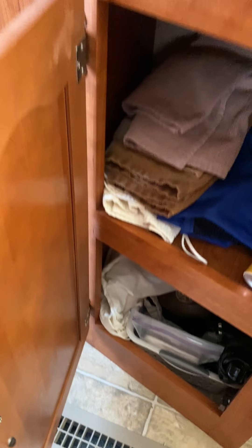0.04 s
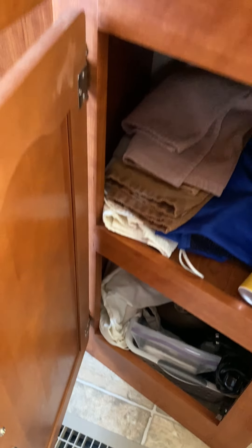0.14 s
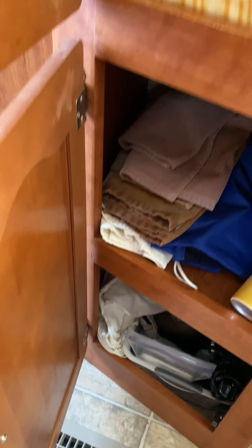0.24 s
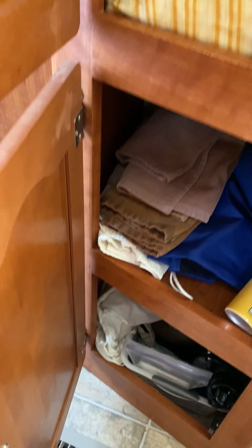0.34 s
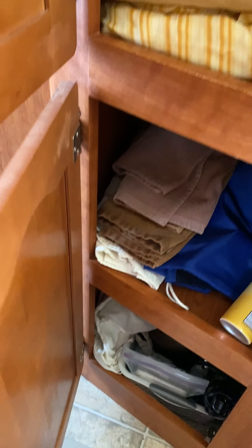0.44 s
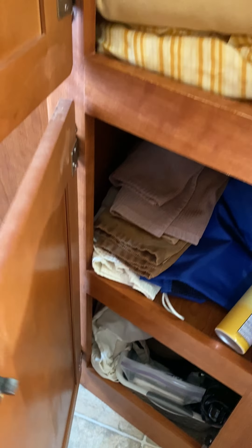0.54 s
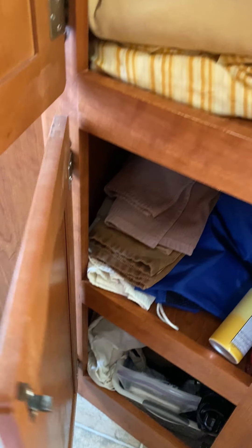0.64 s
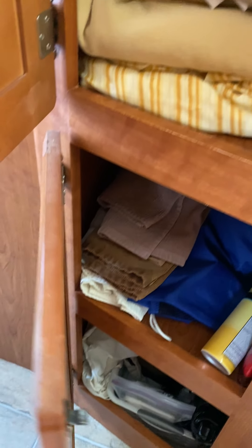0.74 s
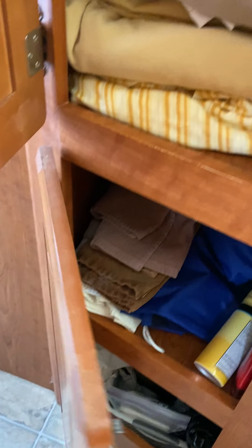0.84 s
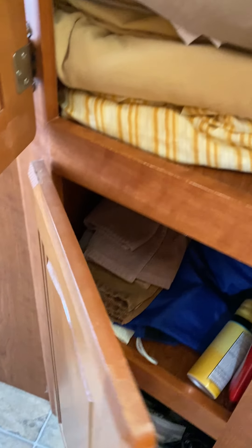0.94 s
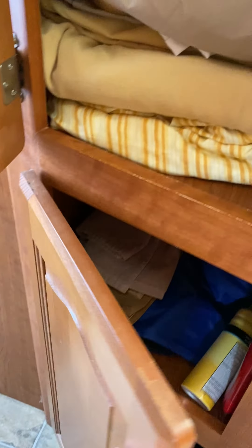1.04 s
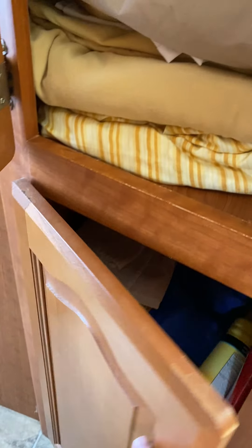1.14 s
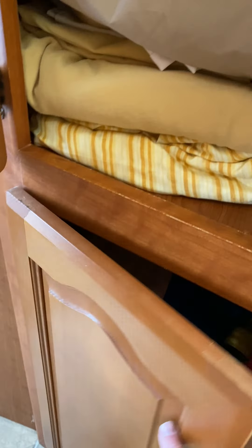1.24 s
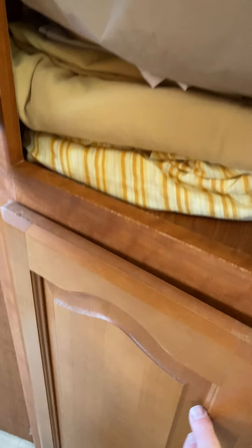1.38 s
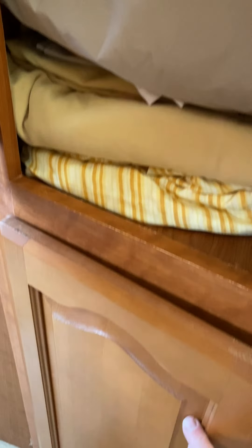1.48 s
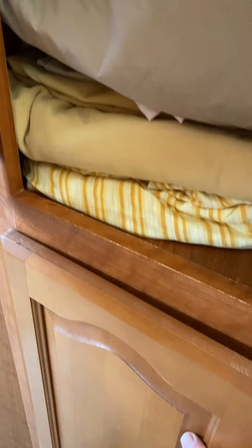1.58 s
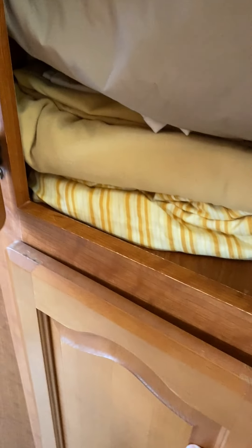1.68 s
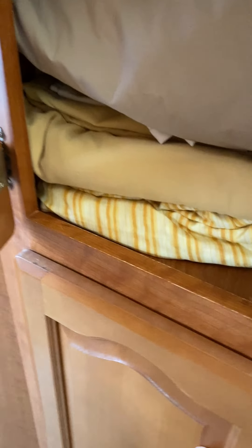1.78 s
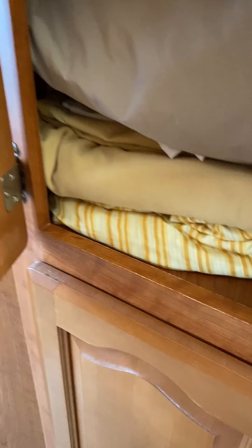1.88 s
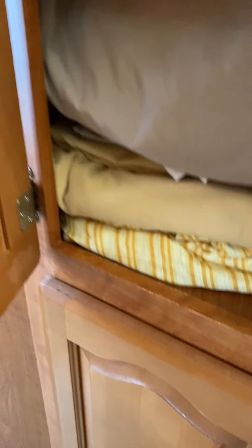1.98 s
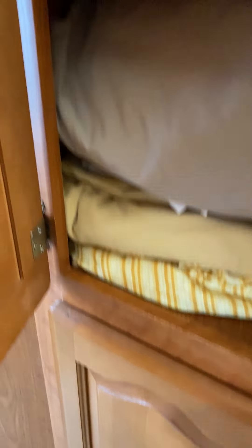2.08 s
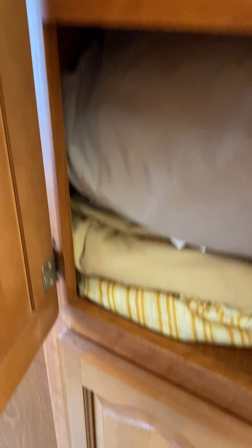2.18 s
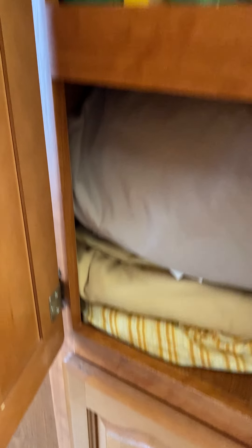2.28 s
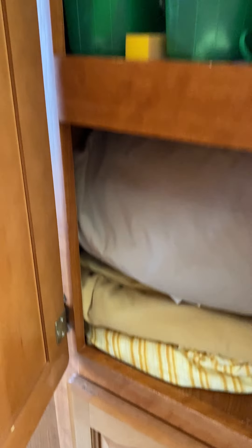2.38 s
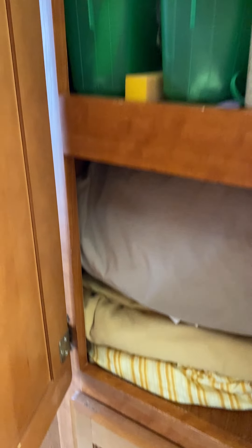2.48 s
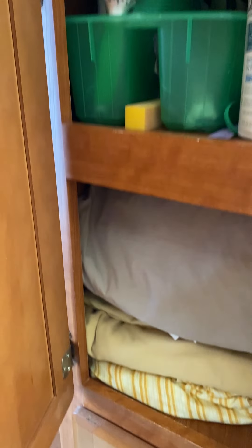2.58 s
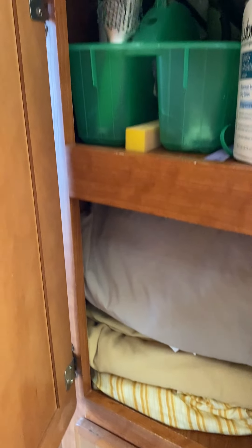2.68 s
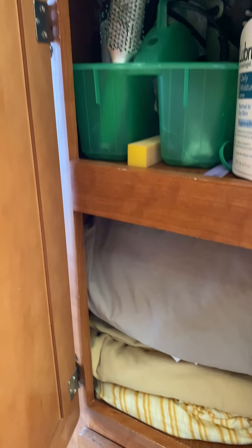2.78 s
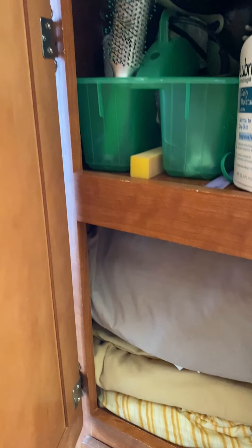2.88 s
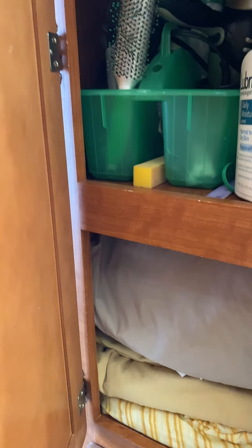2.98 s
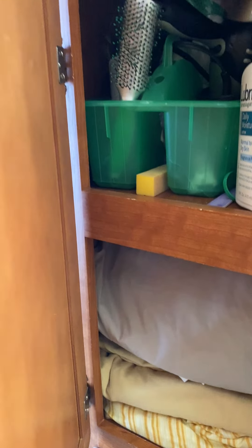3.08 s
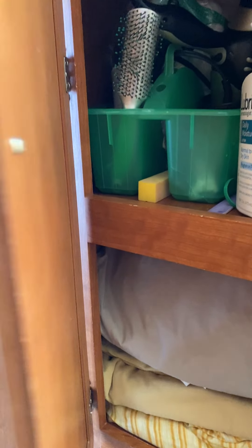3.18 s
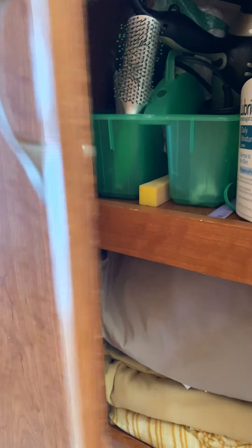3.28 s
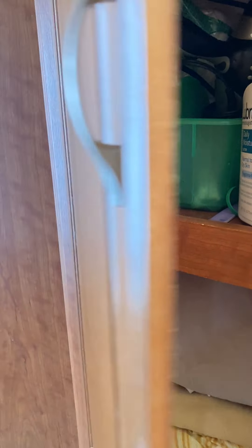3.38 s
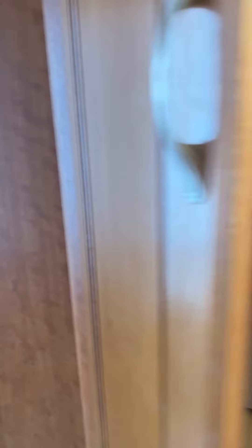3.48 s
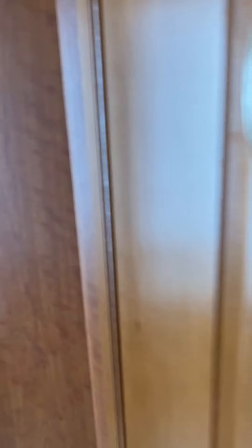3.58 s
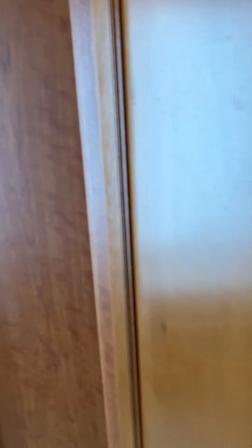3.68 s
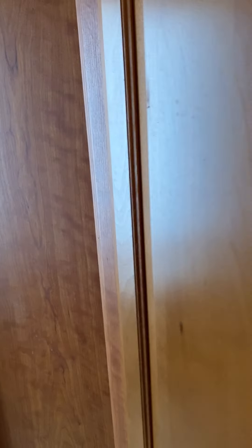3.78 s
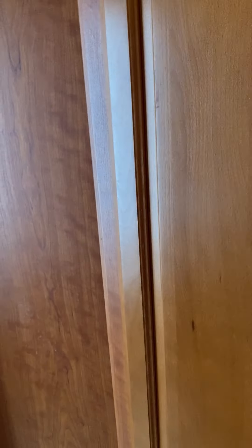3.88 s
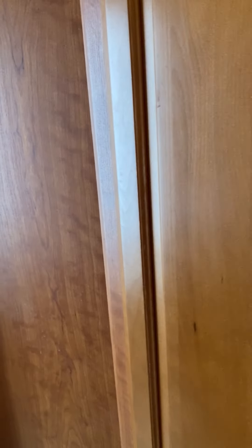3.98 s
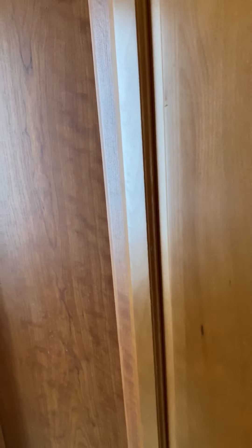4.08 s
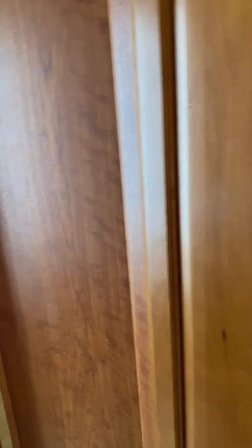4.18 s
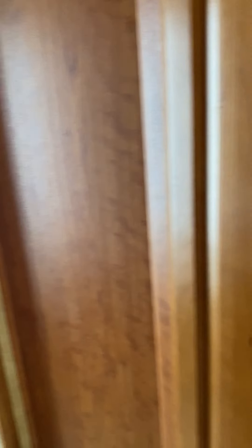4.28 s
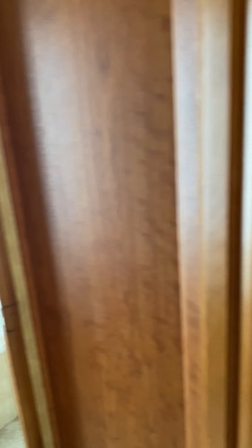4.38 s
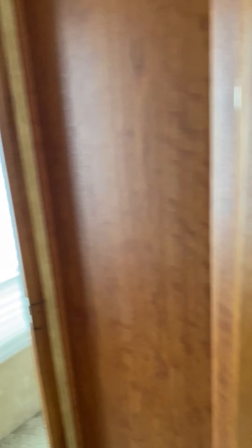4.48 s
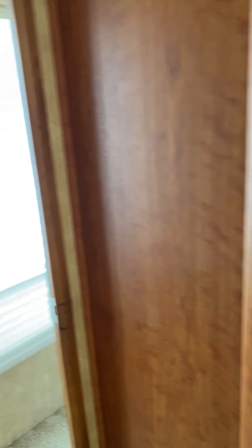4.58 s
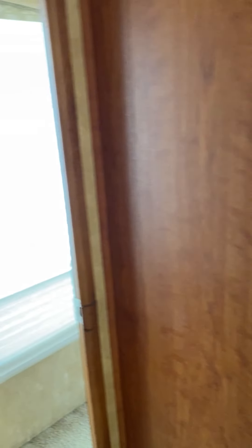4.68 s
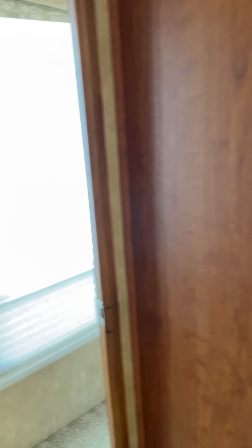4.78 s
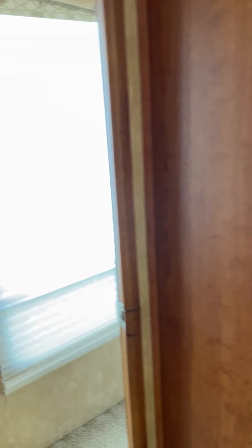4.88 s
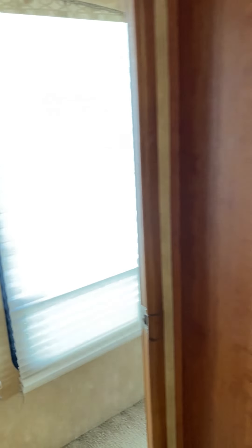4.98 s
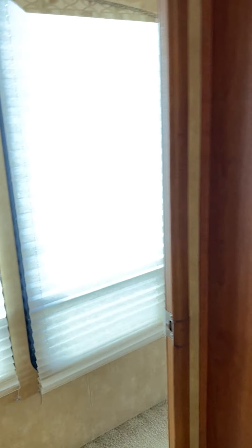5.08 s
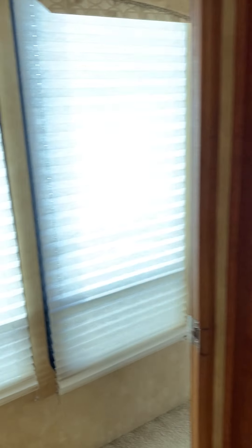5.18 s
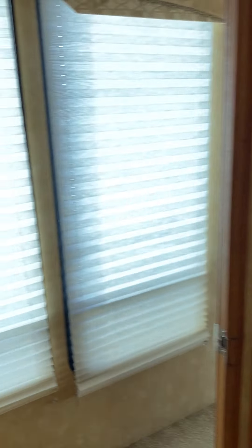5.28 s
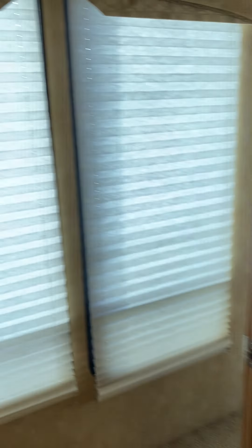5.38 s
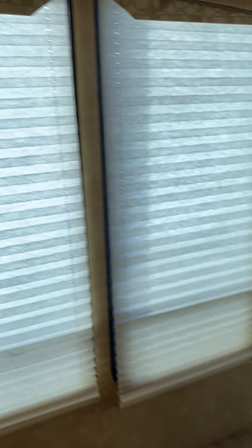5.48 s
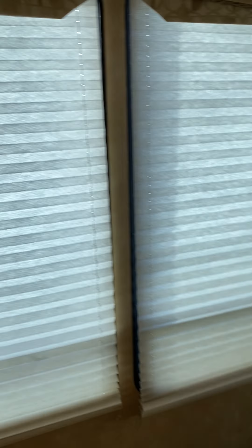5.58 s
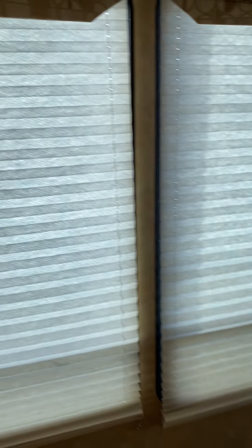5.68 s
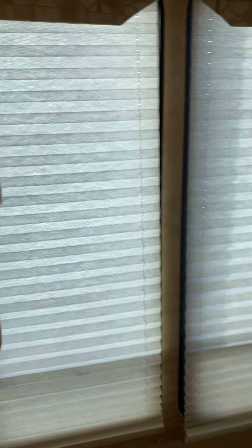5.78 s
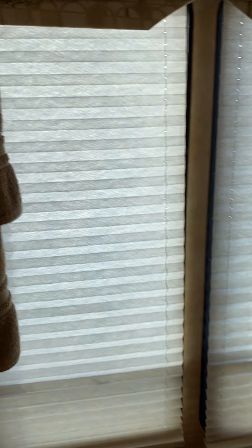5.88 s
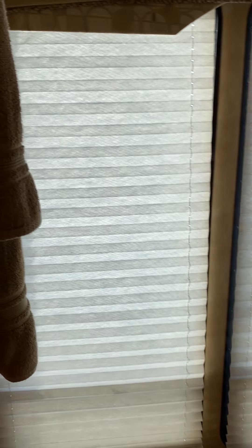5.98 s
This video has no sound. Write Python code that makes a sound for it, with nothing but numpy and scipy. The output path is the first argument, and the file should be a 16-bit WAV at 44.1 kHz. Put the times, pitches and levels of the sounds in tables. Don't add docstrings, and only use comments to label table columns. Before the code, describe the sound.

Two wooden cabinet doors close in a small quiet cabin, each knocking past its catch and slamming hollowly, with a hinge squeak between them.

```python
import sys
import numpy as np
from scipy import signal
from scipy.fft import rfft, irfft
from scipy.io import wavfile
from scipy.ndimage import uniform_filter1d

SR = 44100
rng = np.random.default_rng(int(sys.argv[2]) if len(sys.argv) > 2 else 0)


def invert_db(x):
    u = np.asarray(x, float) / 20
    return 10 ** u


def log_audio(samples):
    frames = np.atleast_2d(samples).T
    limited = np.clip(frames, -1, 1)
    pcm = np.round(limited * 32767).astype(np.int16)
    wavfile.write(sys.argv[1], SR, pcm)


N = 266760
HZ = np.fft.rfftfreq(N, 1 / SR)


def on_log(table, hz, column=1):
    table = np.array(table)
    return np.interp(np.log(np.maximum(hz, 1)), np.log(table[:, 0]), table[:, column])


def unit(x):
    return x / np.sqrt(np.mean(x ** 2))


def add(out, s, x):
    i = int(s * SR)
    out[i:i + len(x)] += x[:N - i]


def filtered(x, order, hz, kind):
    return signal.sosfilt(signal.butter(order, hz, kind, fs=SR, output="sos"), x)


def ring(x, modes):
    out = 0
    for hz, db, t60 in modes:
        pole = np.exp((2j * np.pi * hz - np.log(1000) / t60) / SR)
        out = out + invert_db(db) * signal.lfilter([1], [1, -pole], x + 0j).imag
    return out


def struck(events, rise_s):
    out, t = np.zeros(N), np.arange(SR // 2) / SR
    for s, hz, db, t60 in events:
        envelope = (1 - np.exp(-t / rise_s)) * invert_db(db - 60 * t / t60)
        add(out, s, np.sin(2 * np.pi * hz * t) * envelope)
    return out


def band(lo_hz, hi_hz):
    return unit(filtered(rng.standard_normal(N), 2, [lo_hz, hi_hz], "band"))


def walk(rate):
    k = int(SR / rate)
    steps = np.repeat(rng.standard_normal(N // k + 1), k)
    return unit(uniform_filter1d(steps, k)[:N])


def swells(rows):
    edge_db, edge_curve = 12, 1.9
    t, gains = np.arange(N) / SR, 0
    for s, length, *levels in rows:
        away = np.abs(2 * (t - s) / length)
        shape = invert_db(-edge_db * away ** edge_curve) * np.clip(2 - away, 0, 1)
        gains = gains + invert_db(np.array(levels)[:, None]) * shape
    return gains


def tail(scale):
    # (frequency [Hz], t60 [s])
    cabin_t60 = [(100, 0.35), (400, 0.2), (1500, 0.14), (4000, .16), (10000, 0.09)]
    t, out = np.arange(SR // 2) / SR, 0
    for hz in 63 * 2. ** np.arange(9):
        octave = band(hz / 1.41, min(hz * 1.647, 16500))[:len(t)]
        decay = invert_db(-60 * t / (scale * on_log(cabin_t60, hz)))
        out = out + np.sqrt(min(hz, 6000)) * octave * decay
    return out / np.sqrt(np.sum(out ** 2))


def cabin_echo(x):
    late = filtered(tail(3.2), 2, 700, "high")
    late = late * invert_db(2.5 * walk(98)[:len(late)])
    return signal.fftconvolve(x, invert_db(-10) * tail(0.79) + invert_db(-28) * late)[:N]


def pair(x, column):
    # (frequency [Hz], near sound [0-1], diffuse sound [0-1])
    coherence = [(110, 1, 1), (190, .9995, .996), (320, .95, .8), (700, .75, .25), (1700, .85, .35),
                 (3400, .48, .17), (6400, .985, .975), (14000, .99, .98)]
    alike = np.clip(on_log(coherence, HZ, column), 0, 1)
    scatter = rfft(tail(.08)[:1024])
    all_pass = irfft(scatter / np.abs(scatter))
    other = rfft(signal.fftconvolve(x, all_pass)[:N])
    shared = np.sqrt((1 + alike) / 2) * rfft(x)
    return irfft(shared + np.sqrt((1 - alike) / 2) * other * np.array([[1], [-1]]), N)


def cabin():
    # (frequency [Hz], density [dB per Hz])
    spectrum = [(25, -26), (54, 0.5), (82, -2.5), (130, -18), (500, -37), (2200, -40), (5500, -47),
                (16000, -56)]
    noise = rfft(rng.standard_normal(N)) * invert_db(on_log(spectrum, HZ))
    low = 1 / (1 + (HZ / 200) ** 2)
    rumble = irfft(noise * low, N) * invert_db(2.0 * walk(1.8))
    hiss = irfft(noise * (1 - low), N)
    return invert_db(-61) * (rumble + hiss) / np.sqrt(np.mean(irfft(noise, N) ** 2))


def handling():
    # (middle [s], length [s], level [dB])
    moves = [(.03, 0.11, -56), (.36, 0.18, -58), (1.35, 0.2, -62), (2.2, 0.21, -48), (2.45, .15, -55.5),
             (2.746, 0.073, -44.5), (4.5, .15, -47.5), (4.7, 0.23, -56.5), (5.35, 0.31, -59),
             (5.63, 0.099, -59), (5.8, 0.2, -55)]
    return band(31, 80) * invert_db(3.0 * walk(49)) * swells(moves)[0]


def rubbing():
    # (middle [s], length [s], hiss [dB], dull rub [dB], bright rub [dB])
    cloth = [(.36, 0.13, -91, -87, -89), (1.01, 0.66, -100, -101, -85), (2.2, 0.28, -80, -85, -84),
             (2.73, 0.072, -81, -88, -79), (3.04, 0.052, -73.5, -82, -97), (3.16, 0.17, -74.5, -91, -100),
             (3.51, .1, -75, -88, -74.5), (3.65, 0.16, -73, -75, -83.5), (3.72, 0.047, -75, -82, -100),
             (3.82, 0.15, -70, -90, -75.5), (4.5, 0.074, -79, -83, -86), (4.66, 0.17, -71.5, -81, -72),
             (4.82, 0.2, -67, -84, -71), (5.0, 0.22, -80.5, -78.5, -89), (5.14, 0.14, -86, -89, -91),
             (5.27, 0.21, -70.5, -64.5, -89), (5.37, 0.098, -77.5, -92, -84.5), (5.5, 0.11, -87, -72, -100),
             (5.63, 0.12, -68.5, -78, -76.5), (5.8, .14, -86, -77, -100), (5.95, 0.12, -88.5, -80, -87)]
    # (middle [s], length [s], hiss [dB], dull rub [dB], bright rub [dB])
    roller = [(1.419, 0.023, -64, -66, -83), (1.497, 0.081, -57, -47, -61), (1.602, 0.16, -61.5, -57, -74),
              (1.735, .08, -61, -71.5, -68), (1.786, 0.053, -50, -43, -68.5),
              (2.859, 0.066, -54.5, -57.5, -65), (4.007, 0.09, -53.5, -52, -66),
              (4.08, .15, -56.5, -44.5, -68), (4.14, 0.12, -59, -50.5, -67),
              (4.374, 0.077, -71, -58, -76.5), (4.432, 0.087, -72, -64, -72.5)]
    grain = invert_db(1.2 * walk(80) + 2.0 * walk(600))
    colours = np.array([band(1200, 5900), band(73, 730), band(7800, 12000)])
    return (colours * grain * swells(cloth + roller)).sum(axis=0)


def swishes():
    # (start [s], length [s], centre [Hz], width
    # [Hz], level [dB])
    strokes = [(1.83, .3, 185, 110, -56), (3.059, .15, 1740, 1300, -67), (3.759, .17, 328, 263, -68.5),
               (3.766, 0.12, 1600, 670, -70), (4.627, 0.062, 3240, 301, -80),
               (4.756, 0.072, 1120, 400, -76), (5.4, 0.2, 1670, 280, -72), (3.98, .09, 2600, 1100, -50.5),
               (4.04, 0.054, 2300, 1300, -49), (4.075, .045, 2000, 1700, -44.5),
               (4.075, 0.03, 3500, 550, -50), (4.12, .065, 2200, 1600, -56.5),
               (4.188, .025, 1650, 300, -52), (4.09, 0.022, 600, 320, -44), (3.24, 0.26, 400, 90, -70),
               (1.5, 0.097, 720, 130, -50), (1.52, .035, 1500, 1500, -50), (5.749, 0.072, 1698, 400, -74),
               (5.887, 0.046, 2500, 906, -81)]
    out = np.zeros(N)
    for s, length, hz, width, db in strokes:
        k = int(length * SR)
        add(out, s, invert_db(db) * np.sqrt(np.hanning(k)) * band(hz - width / 2, hz + width / 2)[:k])
    return out


def thuds():
    # (time [s], frequency [Hz], level [dB], t60 [s])
    flexes = [(.35, 107, -36, 0.12), (.44, 76, -40.5, 0.21), (1.435, 84, -25, 0.33), (1.45, 172, -25, 0.31),
              (1.435, 240.3, -29, .3), (1.505, 79.4, -32, 0.5), (1.525, 168, -25, .2),
              (1.585, 175, -35, .2), (1.865, 350, -34, .15), (1.89, 250, -39, .2), (1.97, 175, -38, .2),
              (1.98, 430, -48, .12), (3.95, 265, -25, .15), (4.085, 310, -38, .12), (4.13, 212, -33, .12),
              (4.275, 245, -24, .14), (4.29, 640, -39, .12), (4.35, 170, -35, .2), (4.43, 190, -48, 0.31),
              (1.615, 69, -30, 0.38), (1.825, 50.6, -18, 0.29), (1.87, 63.5, -24, 0.38),
              (1.95, 68.4, -24.5, 0.17), (1.96, 104, -26, 0.26), (2.045, 57.1, -26, 0.19),
              (2.05, 139.7, -44, 0.25), (2.73, 67.3, -37.5, 0.12), (3.95, 95, -21, 0.26),
              (3.955, 55.3, -22, 0.32), (4.095, 85.6, -18.5, .16), (4.135, 54.4, -32, 0.28),
              (4.245, 52.2, -11, .25), (4.335, 46.94, -24.5, 0.34), (4.43, 59.3, -25, 0.11),
              (4.515, 51.39, -34, .17), (5.72, 120.2, -39.5, 0.092)]
    return struck(flexes, .012)


def thin(x):
    return filtered(x, 4, 2650, "high")


def creak():
    # (time [s], rate [slips per s], level [dB])
    slipping = [
        (3.2415, 97, -49),
        (3.26, 76.3, -48),
        (3.32, 72.4, -50),
        (3.346, 76, -51.5),
        (3.36, 96, -50.5),
        (3.402, 118, -51.5),
        (3.428, 176, -55.5),
        (3.462, 264, -63.5),
    ]
    # (frequency [Hz], level [dB], t60 [s])
    hinge_modes = [(78.9, -0.5, 0.049), (228, -10.5, 0.058), (400, -15.5, 0.028), (1040, -16, 0.04),
                   (2170, -14, 0.035), (2920, -7, 0.018), (3500, -5, 0.012), (3920, -15.5, 0.014),
                   (4250, -19, .015), (5270, -14, 0.014), (5930, -10, 0.013), (8870, -11, 0.0065),
                   (10100, -6, 0.0074), (11500, -4, 0.005)]
    steady_share = .2
    out = np.zeros(N)
    s, rate, db = np.transpose(slipping)
    t = np.arange(s[0], s[-1] + .1, 1 / SR)
    turns = np.cumsum(np.interp(t, s, rate)) / SR
    gain = invert_db(np.interp(t, s, db)) * (t < s[-1])
    slips = np.diff(np.floor(turns), prepend=-1) * invert_db(1.2 * rng.standard_normal(len(t)))
    since = turns % 1
    scrape = np.exp(-since / 0.15) * (1 - np.exp(-since / .03))
    grit = (scrape + steady_share / 2) * rng.standard_normal(len(t))
    soft_slips = np.convolve(gain * slips, np.ones(30) / 30)[:len(t)]
    thump = ring(soft_slips, hinge_modes[:3])
    plate = thin(ring(gain * (invert_db(-5) * slips + invert_db(-13) * grit), hinge_modes[3:]))
    add(out, s[0], thump + plate)
    add(out, s[0], gain * invert_db(0.5) * (scrape ** 2 + steady_share) * thin(band(1400, 12000))[:len(t)])
    return out


def squeaks():
    # (time [s], pitch [Hz], level [dB])
    glides = [
        [(2.94, 1045, -56), (2.95, 1060, -47.5), (2.957, 1100, -47), (2.968, 1120, -43), (2.984, 1140, -51)],
        [(2.972, 1132, -43), (3.03, 1140, -65)],
        [(2.985, 1500, -64), (3.014, 1570, -53), (3.03, 1575, -62), (3.06, 1560, -70)],
        [(3.468, 3300, -61), (3.505, 2972, -71)],
        [(3.718, 1997, -62), (3.74, 1986, -59), (3.75, 2078, -56), (3.757, 2090, -65.5), (3.766, 2193, -53.5),
         (3.785, 2420, -60)],
        [(3.778, 2480, -58), (3.79, 2560, -60), (3.815, 2660, -66.5)],
        [(3.826, 3043, -60), (3.848, 2987, -55), (3.862, 2957, -66), (3.878, 3000, -86)],
        [(3.875, 1637, -76), (3.935, 1710, -57)],
    ]
    # (slope [dB per overtone], roughness [0-1])
    tones = [(-3, .2), (-18, .1), (-22, .3), (-4, .4), (-3, .1), (-3, .35), (-11, .07), (-32, .08)]
    # (frequency [Hz], level [dB])
    pin = [(1000, -8.5), (2200, 2), (3400, 5), (5500, 3.5), (7000, -2.5), (12000, -3)]
    out = np.zeros(N)
    for rows, (slope_db, rough) in zip(glides, tones):
        s, *columns = np.transpose(rows)
        t = np.arange(s[0], s[-1], 1 / SR)
        hz, db = (np.interp(t, s, c) for c in columns)
        tremble = walk(700)[:len(t)]
        phase = 2 * np.pi * np.cumsum(hz * (1 + 0.11 * rough * tremble)) / SR
        tone = 0
        for k in range(1, 12):
            level = invert_db(slope_db * (k - 1) + on_log(pin, k * hz)) * (k * hz < 14000)
            tone = tone + level * np.sin(k * phase + k * k)
        gain = invert_db(db + 3.1 * rough * tremble + 2.8 * walk(110)[:len(t)])
        add(out, s[0], tone * gain * np.hanning(len(t)) ** 0.13)
    return out


def contact_ring():
    # (time [s], frequency [Hz], level [dB], t60 [s])
    rings = [(1.4275, 1420, -20, 0.028), (1.4285, 2620, -24, 0.025), (1.434, 1200, -18, 0.017),
             (1.44, 393, -31, 0.081), (1.7905, 2900, -11, .035), (1.793, 2210, -10, 0.044),
             (1.7955, 1370, -7, 0.034), (1.801, 630, -15, 0.082), (1.804, 1136, -18, 0.096),
             (1.803, 310, -19, .07), (1.804, 1850, -14, 0.029), (3.939, 1200, -24, 0.042),
             (3.944, 2400, -26, .06), (3.946, 1600, -26.5, .07), (3.946, 430, -22.5, .04),
             (4.214, 2200, -22, 0.035), (4.236, 1287, -14.5, 0.046), (4.236, 405, -16, .09),
             (4.24, 312, -25, .12), (4.232, 655, -16, .08), (4.067, 3560, -41, 0.031),
             (4.067, 3880, -42, .02), (1.801, 228, -13, .11), (1.793, 860, -21, .05), (1.43, 620, -22, .06),
             (4.228, 3600, -17, .012), (1.429, 1760, -22, 0.03), (1.438, 702, -17.5, 0.079),
             (1.792, 2330, -3, 0.015), (1.794, 1500, -6, 0.05), (4.217, 1046, -20, 0.056),
             (1.529, 3650, -39, 0.018), (1.559, 3585, -40, 0.03), (3.942, 320, -17, 0.09),
             (3.944, 210, -31.5, 0.23), (1.76, 1098, -41, 0.042), (2.806, 2620, -40.5, 0.035),
             (2.837, 4050, -34, 0.019), (2.837, 3310, -40, 0.05), (3.936, 3117, -17.5, 0.03),
             (3.94, 10570, -19.5, 0.015), (4.066, 3710, -39, 0.03), (4.085, 3398, -50, 0.035),
             (5.266, 4080, -60, .03)]
    return struck(rings, 0.00015)


def slap():
    # (time [s], frequency [Hz], level [dB], t60 [s])
    slaps = [
        (1.8005, 88, -11, .09),
        (4.2385, 170, -4, .04),
    ]
    return -struck(slaps, .0005)


def door(knocks, pushes, panel, box, ring_db, push_s):
    # (frequency [Hz], level [dB])
    wood = [(100, -16.5), (300, -3.5), (2200, -4), (4000, -7.5), (6500, -15.5), (9000, -18), (12000, -17.5),
            (15500, -25.5)]
    panel_db_per_tilt = -1.51
    out, shake, push = np.zeros(N), np.zeros(N), np.zeros(N)
    t, hz = np.arange(8192) / SR, np.fft.rfftfreq(8192, 1 / SR)
    for s, db, tilt_db, t60 in knocks:
        colour = invert_db(on_log(wood, hz) + tilt_db * np.log2(np.maximum(hz, 100) / 1500))
        chatter = unit(irfft(rfft(rng.standard_normal(len(t))) * colour))
        burst = chatter * (1 - np.exp(-t / (0.0056 * t60))) * invert_db(db - 60 * t / t60) / 2
        add(out, s, burst)
        add(shake, s, burst * invert_db(ring_db + panel_db_per_tilt * tilt_db))
    for s, db in pushes:
        add(push, s, invert_db(db) * unit(np.hanning(int(push_s * SR))) / (push_s * SR))
    boom = filtered(ring(push, box), 2, 55, "high")
    return out + ring(shake, panel) - boom


def low_door():
    # (time [s], peak [dB], tilt [dB per octave], chatter t60 [s])
    knocks = [(1.4265, -20, 5.5, 0.042), (1.428, -12, -1, 0.043), (1.438, -19, -7.5, 0.079),
              (1.529, -35, 4, 0.03), (1.545, -41.5, -0.56, 0.12), (1.559, -22.5, 1, 0.032),
              (1.561, -33, -4.5, 0.093), (1.607, -45.5, -0.9, .03), (1.644, -45, 0.2, 0.034),
              (1.757, -44, -2.5, 0.06), (1.7905, -3, -0.12, 0.036), (1.794, -3.5, -3.5, 0.027),
              (1.798, -2, -1, 0.047), (1.815, -18.5, -2.5, 0.16), (1.94, -46, -0.9, 0.28),
              (2.437, -61.5, -1, .025)]
    # (time [s], level [dB])
    pushes = [
        (1.4315, -28.5),
        (1.4417, -30),
        (1.5645, -34.5),
        (1.61, -35.5),
        (1.647, -38.5),
        (1.7975, -21.5),
        (1.8016, -4.5),
    ]
    # (frequency [Hz], level [dB], t60 [s])
    panel = [(172, -4, 0.12), (242, -1.5, 0.16), (305, -2, 0.04), (400, -12, .05), (474, -5.5, 0.075),
             (630, -13, 0.067), (987.1, -17.5, .06), (1170, -12, .06), (1260, -6.5, 0.04),
             (1430, -5, 0.074), (1800, -7, 0.06), (2200, -4.5, 0.081), (2580, -6.5, 0.06),
             (2880, -6.5, 0.038)]
    # (frequency [Hz], level [dB], t60 [s])
    box = [(76, -9, 0.36), (98.4, 1.5, 0.12), (140, -4.5, 0.16), (167, -12, 0.14)]
    return door(knocks, pushes, panel, box, ring_db=-46.5, push_s=0.0036)


def tall_door():
    # (time [s], peak [dB], tilt [dB per octave], chatter t60 [s])
    knocks = [(2.806, -32.5, 4.5, .053), (2.820, -39.5, 0.5, 0.1), (2.837, -21.5, 6, .014),
              (2.942, -55, 3.5, 0.029), (3.918, -50.5, 1.5, .32), (3.929, -38.5, 3, 0.079),
              (3.936, -10, 2.5, 0.039), (3.943, -17, 0, 0.1), (4.09, -35, -2, 0.098),
              (4.192, -42, -0.5, .13), (4.2, -34.5, -1.4, 0.13), (4.216, -10.5, 1, .04),
              (4.2275, -11.5, 7, 0.043), (4.229, -9, -1, 0.08), (4.2345, -11, -4.5, 0.085),
              (4.275, -24.5, -4, 0.16), (5.268, -50, -3.5, 0.017)]
    # (time [s], level [dB])
    pushes = [
        (2.84, -49),
        (3.9475, -21),
        (4.0702, -33.5),
        (4.0978, -32),
        (4.2211, -34.5),
        (4.238, -7),
        (4.2784, -32.5),
    ]
    # (frequency [Hz], level [dB], t60 [s])
    panel = [(195, -6, 0.073), (252, -3.5, 0.12), (310, -11, 0.14), (380, -11.5, 0.03), (412.4, 1, 0.068),
             (493, -7.5, 0.054), (718.4, -1.5, 0.087), (968, -10.5, 0.067), (1247, -27, 0.065),
             (1500, -15, 0.051), (1711, -6.5, 0.045), (2340, -13.5, 0.03)]
    # (frequency [Hz], level [dB], t60 [s])
    box = [(95, -12, 0.039), (128, -1, 0.04), (154, 3, 0.045), (192, -4, 0.059)]
    return door(knocks, pushes, panel, box, ring_db=-45.5, push_s=.004)


def scene():
    doors = low_door() + tall_door() + contact_ring() + slap()
    hinge = squeaks() + creak()
    echo = cabin_echo(doors + hinge / np.sqrt(10))
    near = doors + hinge + thuds()
    diffuse = echo + rubbing() + handling() + swishes() + cabin()
    return pair(near, column=1) + pair(diffuse, column=2)


def roll_off(x):
    return signal.sosfilt(signal.butter(12, 17000, fs=SR, output="sos"), x)


def record(dry):
    # (frequency [Hz], lead of the left channel [rad])
    lead = [(40, 0), (950, -.65), (4200, 1.3), (5400, .7), (6900, 2.95), (8000, 3.5), (13400, 9.4),
            (17000, 12.5)]
    turn = np.exp(.5j * np.interp(HZ, *np.transpose(lead)) * np.array([[1], [-1]]))
    x = filtered(irfft(rfft(dry) * turn, N), 4, 36, "high")
    x = np.tanh(1.02 * x) / 1.02
    x = signal.sosfilt(signal.ellip(8, .3, 60, 15900, fs=SR, output="sos"), x)
    return roll_off(x)


dry = scene()
out = record(dry)
log_audio(out)
```